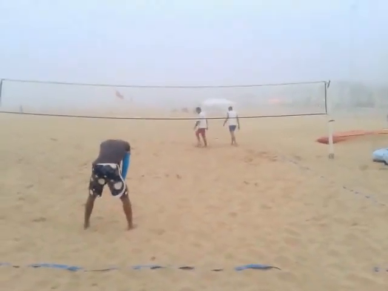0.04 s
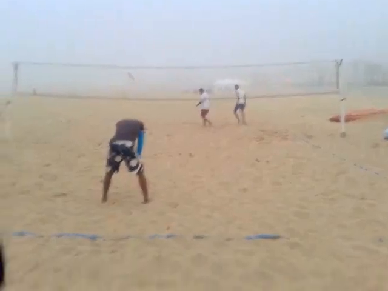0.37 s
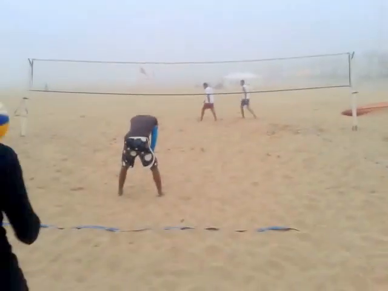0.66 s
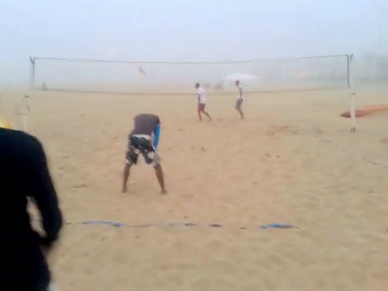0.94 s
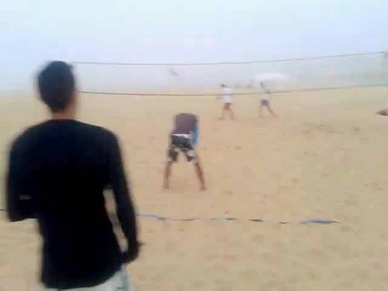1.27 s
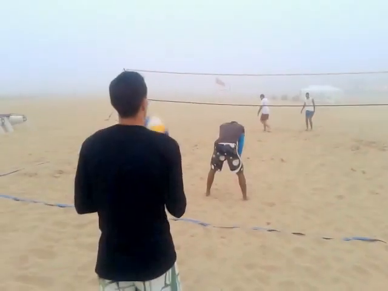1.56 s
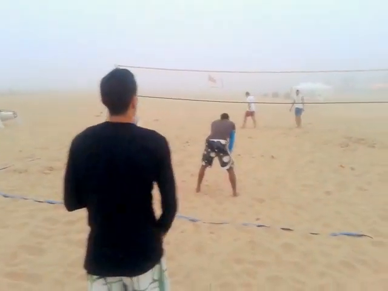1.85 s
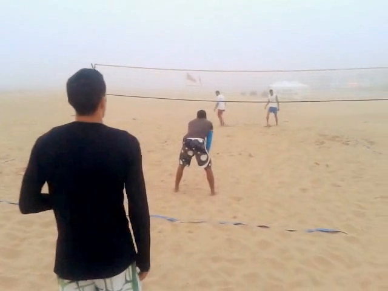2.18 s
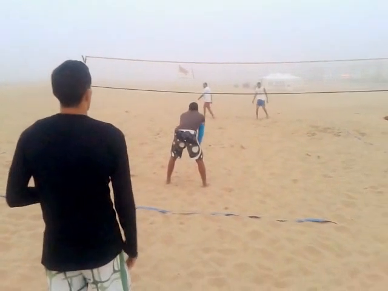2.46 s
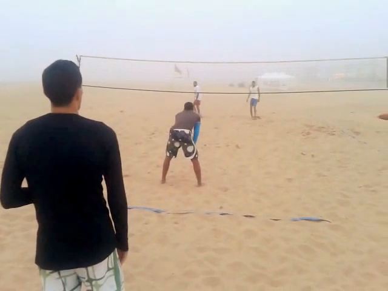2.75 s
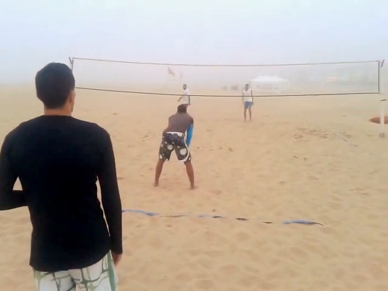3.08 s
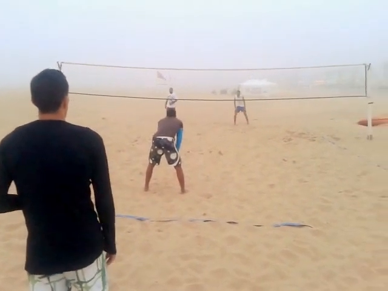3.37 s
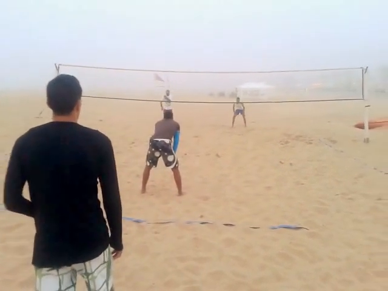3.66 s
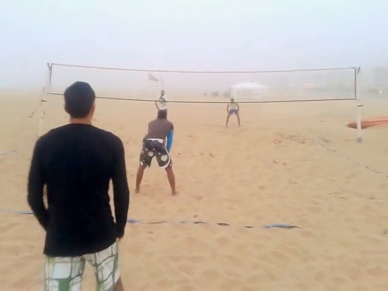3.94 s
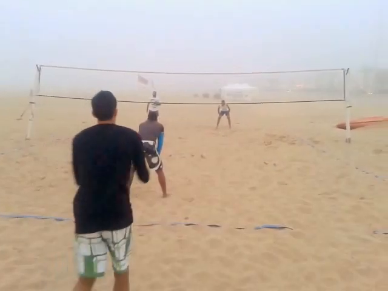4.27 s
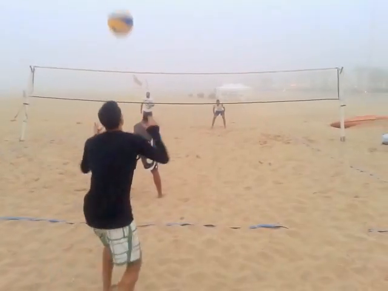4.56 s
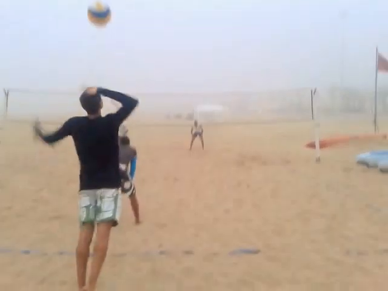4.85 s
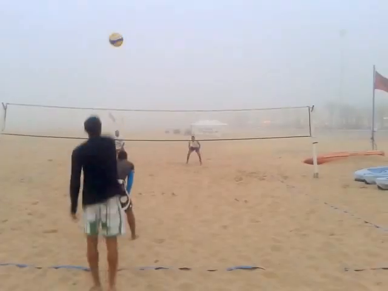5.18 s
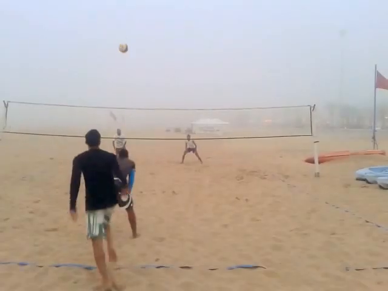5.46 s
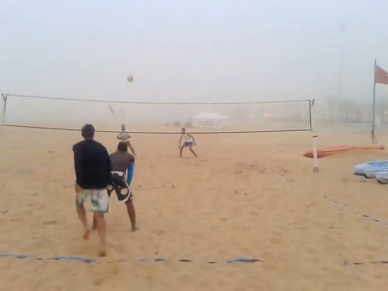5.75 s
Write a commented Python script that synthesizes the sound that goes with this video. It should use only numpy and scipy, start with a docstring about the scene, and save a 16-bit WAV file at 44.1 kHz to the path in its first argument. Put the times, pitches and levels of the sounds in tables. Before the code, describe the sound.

A soft pat and two lighter taps on a volleyball come first, heard through a single microphone outdoors on a beach. Low wind buffets the microphone in uneven gusts while far surf hisses evenly behind. Near the end the wind eases and a hand cracks against the ball in a hard serve, by far the loudest sound, followed by a faint, dull footfall on sand.

```python
"""Beach volleyball serve

Open beach, one microphone in the wind. A player pats the ball, touches it lightly twice and serves
with one sharp smack: the ball squashes and rings, air cracks out from under the hand, and only the
sand throws it back. A foot lands just after. Distant surf washes steadily; gusts buffet the mic."""
import sys
import numpy as np
from scipy import signal
from scipy.fft import rfft, irfft
from scipy.io import wavfile

SR = 44100
rng = np.random.default_rng(int(sys.argv[2]) if len(sys.argv) > 2 else 0)


def materialize(psi):
    """Save the field psi as 16-bit PCM at rate SR to the path in sys.argv[1].

    A 1-D psi becomes a single channel; in a 2-D psi each row is a channel.
    """
    bounded = np.clip(np.atleast_2d(psi).T, -1, 1)
    quanta = np.round(bounded * 32767).astype(np.int16)
    wavfile.write(sys.argv[1], SR, quanta)


N = 261072

# spectrum of the distant surf: (f/Hz, level/dB per Hz)
SURF_SPECTRUM = [(20, -5.5), (62, 3), (105, -6.5), (300, -10), (550, -17), (1000, -19), (1450, -19.5),
                 (2200, -16.5), (2800, -22), (3900, -30), (5600, -32.5), (6600, -44), (7800, -72.5),
                 (15500, -82.5)]
# spectrum of the faint hiss above it: (f/Hz, level/dB per Hz)
HISS_SPECTRUM = [(20, -60), (5000, -31), (6500, 3.5), (7500, 3), (10000, -1), (15500, -8.5)]
# strength of that hiss, fading for a while in the middle: (t/s, level/dB)
HISS_LEVELS = [(0, -71), (1.4, -74.5), (2.75, -77), (2.85, -99), (4.82, -94.5), (4.9, -71), (5.92, -72)]
# wind at the mic, four short gusts, then a long blow that drops before the serve: (t/s, level/dB)
WIND_LEVELS = [(0.0, -46.5), (0.68, -49.5), (0.85, -40.5), (1.15, -54), (1.55, -36), (1.9, -47),
               (2.02, -40.5), (2.15, -49.5), (2.33, -33), (2.48, -43), (2.75, -40.5), (2.95, -34.5),
               (3.7, -33.5), (3.88, -37.5), (4.3, -34), (4.62, -37.5), (4.84, -30.5), (4.92, -50),
               (5.92, -49.5)]
# spectrum of the wind's rumble: (f/Hz, level/dB per Hz)
WIND_SPECTRUM = [(20, -17), (40, 1.5), (65, 5.5), (110, 4.5), (180, 0), (250, -3.5), (330, -11), (450, -20),
                 (650, -39), (1500, -108)]
# the hardest eddies that strike the mic: (t/s, peak level/dB, f/Hz)
HARD_EDDIES = [(0.812, -33, 90), (0.948, -31.5, 151), (1.362, -27, 153), (1.706, -26, 114),
               (2.019, -28, 180), (2.268, -25.5, 252), (2.311, -25, 243), (2.353, -24, 217),
               (2.428, -27.5, 160), (2.593, -24, 100), (2.932, -23, 157), (2.947, -22.5, 165),
               (3.016, -22, 124), (3.045, -27.5, 169), (3.098, -31, 150), (3.221, -25, 142),
               (3.238, -22, 153), (3.325, -28, 164), (3.349, -24, 138), (3.42, -37, 190),
               (3.549, -26.5, 206), (3.634, -22.5, 120), (3.686, -23, 168), (3.702, -28, 165),
               (3.838, -25.5, 134), (3.94, -26.5, 185), (4.028, -24.5, 194), (4.249, -29.5, 198),
               (4.281, -25.5, 186), (4.325, -25, 170), (4.501, -27, 123), (4.738, -22, 164),
               (4.751, -25, 145), (4.817, -24.5, 196), (4.833, -25, 189)]
# the foot landing after the serve: (t/s, level/dB, length/s)
FOOTFALLS = [(5.4445, -37.5, 0.007)]
# spectrum of a puff of sand: (f/Hz, level/dB per Hz)
SAND_SPECTRUM = [(60, -10), (160, 2), (350, -4), (680, 4), (1000, -1.5), (1500, -16), (4000, -30),
                 (12000, -75)]
# hand on ball, a pat, two light touches and the serve: (t/s, level/dB, squash f/Hz, squash gain/dB,
# crack gain/dB, hardness 0-1, squash delay/s, squash length/s, fingers against palm/dB)
BLOWS = [(0.5473, -14.5, 166, -7, -2, 0.39, 0.0024, 0.008, -3),
         (0.9912, -22.5, 130, -15, -14, 0.3, 0.0005, 0.005, -10),
         (1.5105, -21, 175, -5.5, -14, 0.25, 0.0018, 0.011, -10),
         (5.1188, 0.5, 171.6, -4.5, -5, 0.97, 0.0001, 0.011, -17)]
# modes of the ball's shell and air cavity: (f/Hz, level/dB, t60/s)
BALL_MODES = [(423, -26.2, 0.077), (643, -20, 0.048), (740, -21.6, 0.03), (791, -18.5, 0.039),
              (982, -27.4, 0.078), (1047, -25.8, 0.055), (1168, -11.9, 0.02), (1369, -25.6, 0.032),
              (1551, -20.4, 0.032), (1882, -22.5, 0.036), (2524, -25, 0.032), (2732, -29, 0.034),
              (3487, -22, 0.023), (4260, -25, 0.02), (5450, -23.5, 0.015), (6270, -21, 0.014),
              (7800, -23, 0.008), (12600, -25, 0.006)]
# air squeezed out between palm and ball, at full hardness: (f/Hz, level/dB per Hz)
CRACK_SPECTRUM = [(600, -5), (1800, 5.5), (3000, 0), (4200, -10), (5800, 17), (7000, 3), (8500, -2),
                  (10000, -4), (12700, 0), (15500, -6), (20000, -26)]
# dense, damped vibration of the ball's cover: (f/Hz, level/dB per Hz)
SHUDDER_SPECTRUM = [(60, -6), (330, 7), (500, -3), (1400, -3), (2100, 0), (3000, -3), (4500, -6),
                    (8000, -28), (16000, -45)]


def gain_of(db):
    """Decibels to amplitude."""
    return 10 ** (np.asarray(db) / 20)


def evened(x):
    """Scales to rms 1."""
    return x / np.sqrt(np.mean(x ** 2) + 1e-20)


def read(points, hz):
    """A spectrum table, joined on a log-frequency axis."""
    f, value = np.transpose(points)
    return np.interp(np.log(hz + 1), np.log(f + 1), value)


def curve(rows):
    """A time table, joined by straight lines."""
    return np.interp(np.arange(N) / SR, *np.transpose(rows))


def add(mix, s, sound):
    """Lays a sound into the mix at time s."""
    part = mix[round(s * SR):][:len(sound)]
    part += sound[:len(part)]


def noise(colour, size):
    """Noise of rms 1 with the given spectrum."""
    gains = gain_of(read(colour, np.fft.rfftfreq(size, 1 / SR)))
    return evened(irfft(rfft(rng.standard_normal(size)) * gains, size))


def drift(rate_hz):
    """Random wander of rms 1, with nothing much faster than the rate."""
    hz = np.fft.rfftfreq(N, 1 / SR)
    return evened(irfft(rfft(rng.standard_normal(N)) * np.exp(-(hz / rate_hz) ** 2), N))


def surf(level_db=-40.5, swell_db=0.56):
    """Far breakers merge into a smooth, steady wash."""
    return gain_of(level_db + swell_db * drift(rate_hz=5.8)) * noise(SURF_SPECTRUM, N)


def hiss():
    """A faint, airy treble above the wash."""
    return gain_of(curve(HISS_LEVELS)) * noise(HISS_SPECTRUM, N)


def eddy(hz):
    """One push and pull of air on the mic, centred in its window."""
    phase = 2 * np.pi * hz * np.arange(-1024, 1024) / SR
    return -phase * np.exp((1 - phase ** 2) / 2)


def wind(rumble_db=0.13, lumpy_db=1.5, eddies_per_s=18, eddy_db=1.5, eddy_hz=192, spread_octaves=0.17):
    """Turbulence right at the mic: a lumpy rumble, hard eddies and lesser ones at random."""
    wind_db = curve(WIND_LEVELS)
    out = gain_of(wind_db + rumble_db + lumpy_db * drift(rate_hz=40)) * noise(WIND_SPECTRUM, N)
    onsets = np.flatnonzero(rng.random(N) < eddies_per_s / SR)
    peak_db = wind_db + eddy_db + rng.standard_normal(N)
    pitch_hz = eddy_hz * 2 ** (spread_octaves * rng.standard_normal(N))
    lesser_eddies = [(i / SR, peak_db[i], pitch_hz[i]) for i in onsets]
    for s, db, hz in list(HARD_EDDIES) + lesser_eddies:
        push = gain_of(db) * eddy(hz)
        add(out, max(s - len(push) / 2 / SR, 0), push)
    return out


def footfall():
    """The landing foot gives a short, dull puff of sand."""
    out = np.zeros(N)
    t = np.arange(8192) / SR
    for s, db, length_s in FOOTFALLS:
        puff = 2 * t / length_s * np.exp(1 - 2 * t / length_s)
        add(out, s, gain_of(db) * puff * noise(SAND_SPECTRUM, len(t)))
    return out


def squash(age, hz, length_s, puff_hz=55, puff_db=-14, puff_s=0.012):
    """The whole ball swings for a few cycles at most and shoves a low puff of air aside."""
    swing = (1 - np.exp(-age / 0.00078)) * np.exp(-(age / length_s) ** 3)
    puff = gain_of(puff_db) * np.exp(-age / puff_s) * np.sin(2 * np.pi * puff_hz * age)
    return swing * np.sin(2 * np.pi * hz * age + 0.65) - puff


def ring(t, since_closed, hardness):
    """Shell and cavity ring: low modes from first touch, high ones once the palm closes."""
    out = np.zeros(len(t))
    for hz, db, t60 in BALL_MODES:
        age = t if hz < 2200 else since_closed
        softening_db = (hardness - 1) * hz / 400  # a soft blow wakes the high modes less
        envelope = gain_of(db + softening_db - 60 * age / t60) * (1 - np.exp(-age / 0.00035))
        out += envelope * np.sin(2 * np.pi * hz * age)
    return out


def crack(age, hardness):
    """Trapped air escapes under the hand, faster and higher in pitch the harder the blow."""
    escape = (1 - np.exp(-age / 0.00015)) * np.exp(-age * hardness ** 0.5 / 0.00069)
    spectrum = [(hz * hardness, db) for hz, db in CRACK_SPECTRUM]
    return gain_of(-11) * escape * noise(spectrum, len(age))


def shudder(t, decay_s=0.0062):
    """The cover vibrates on for a moment, duller than the crack."""
    envelope = (1 - np.exp(-t / 0.00099)) * np.exp(-t / decay_s)
    return gain_of(-22) * envelope * noise(SHUDDER_SPECTRUM, len(t))


def smack(squash_hz, squash_db, crack_db, hardness, delay_s, squash_s, fingers_db):
    """The hand lands, the ball squashes, palm then fingers crack, and the hand chokes the ring."""
    contact_s, fingers_lag_s, choke_s = 0.00073, 0.005, 0.0214
    t = np.arange(8192) / SR
    since_closed = np.maximum(t - 0.00103 * hardness, 0)  # the palm closes just after first touch
    since_fingers = np.maximum(since_closed - fingers_lag_s, 0)
    contact = hardness * gain_of(-10.2) * np.sin(np.pi * np.minimum(t / contact_s, 1)) ** 2
    thump = gain_of(squash_db) * squash(np.maximum(t - delay_s, 0), squash_hz, squash_s)
    palm = gain_of(crack_db) * crack(since_closed, hardness)
    fingers = gain_of(crack_db + fingers_db) * crack(since_fingers, hardness)
    vibration = ring(t, since_closed, hardness) + hardness * shudder(t)
    choke = np.exp(-(t / choke_s) ** 4)
    return contact + thump + palm + fingers + choke * vibration


def ball(echo_s=0.01225, echo_db=-10.7, echo_band_hz=(700, 1400)):
    """Each blow reaches the mic directly, then dulled off the sand."""
    out = np.zeros(N)
    for s, db, *touch in BLOWS:
        add(out, s, gain_of(db) * smack(*touch))
    dulled = signal.sosfilt(signal.butter(2, echo_band_hz, "bandpass", fs=SR, output="sos"), out)
    add(out, echo_s, gain_of(echo_db) * dulled)
    return out


def scene():
    """Player, wind and far surf at one microphone, in mono."""
    return (ball() + footfall() + wind() + surf() + hiss())[None]


def record(dry, ceiling=0.72, cutoff_hz=15800):
    """The serve just overloads the recorder, which also cuts the highest treble."""
    clipped = dry / (1 + (dry / ceiling) ** 10) ** (1 / 10)
    lowpass = signal.firwin(511, cutoff_hz, window=("kaiser", 9), fs=SR)
    return signal.oaconvolve(clipped, lowpass[None], "same")


dry = scene()
out = record(dry)
materialize(out)
```